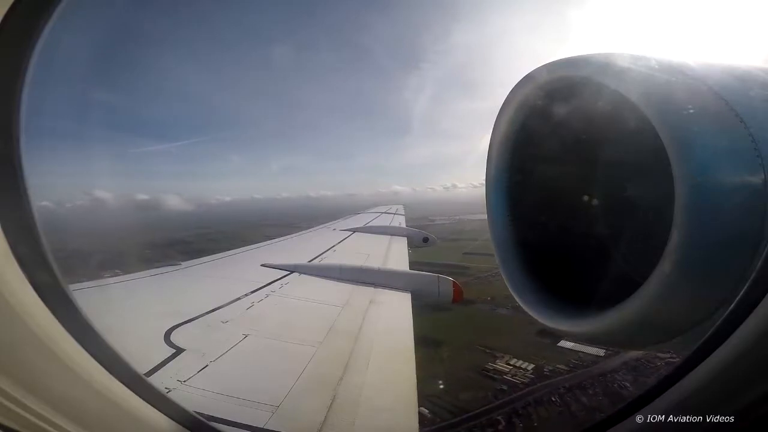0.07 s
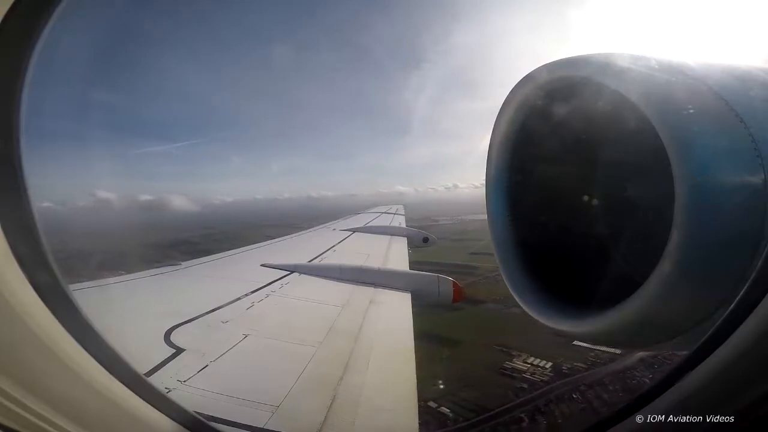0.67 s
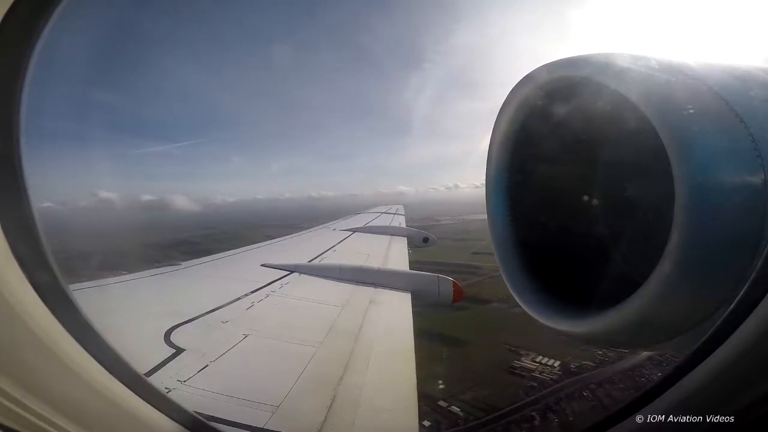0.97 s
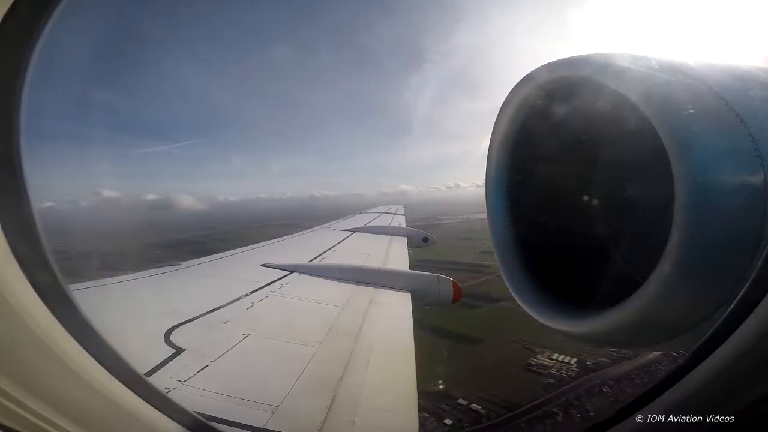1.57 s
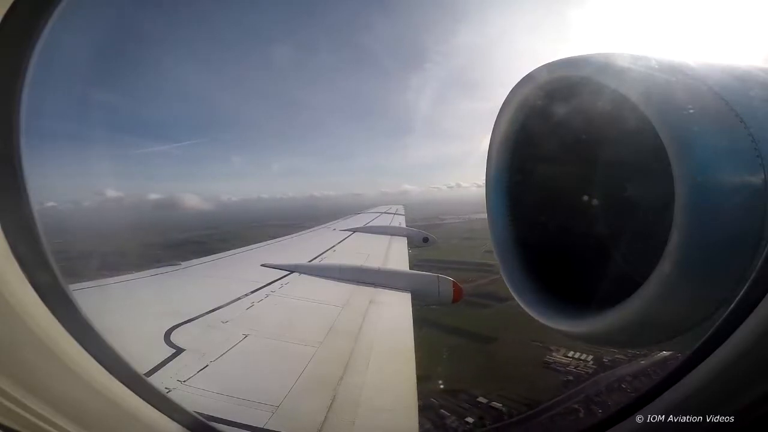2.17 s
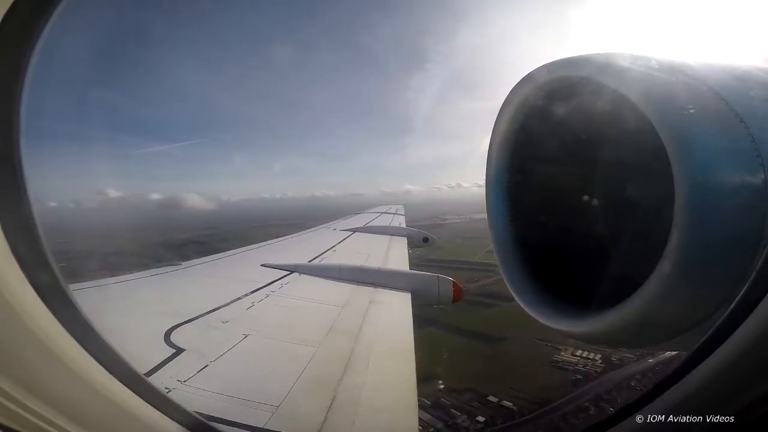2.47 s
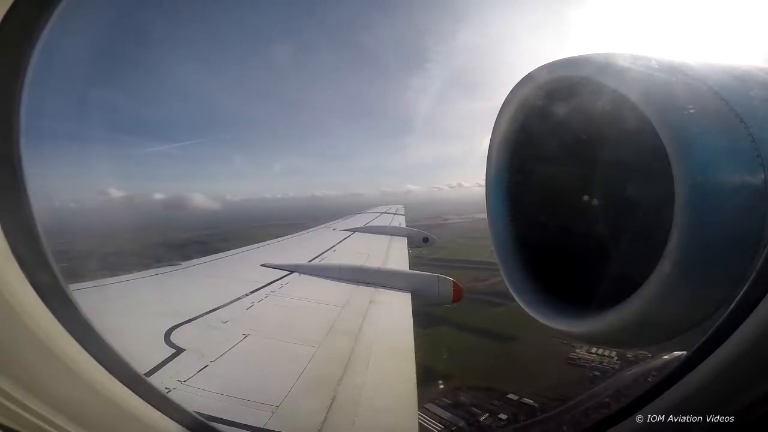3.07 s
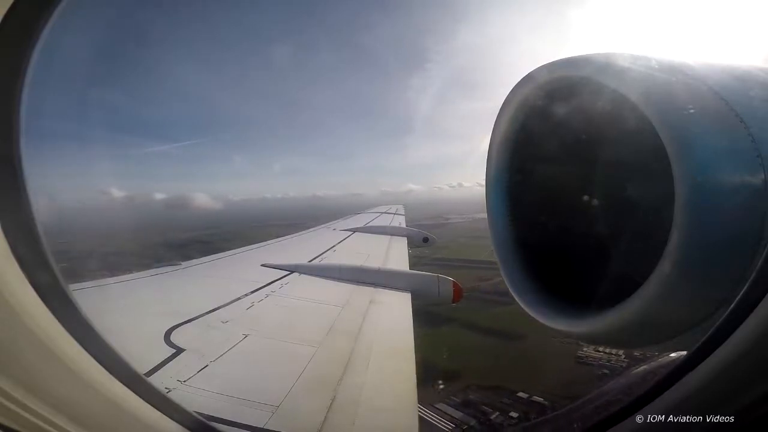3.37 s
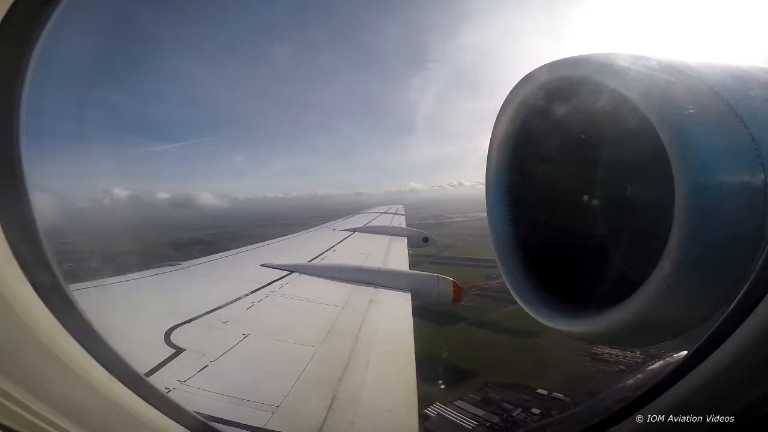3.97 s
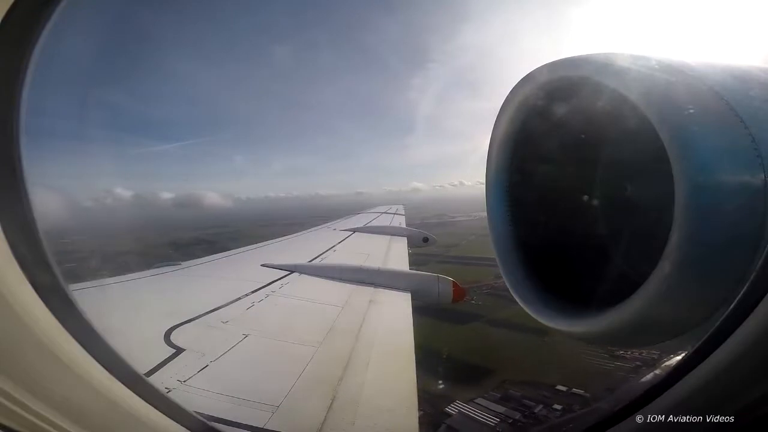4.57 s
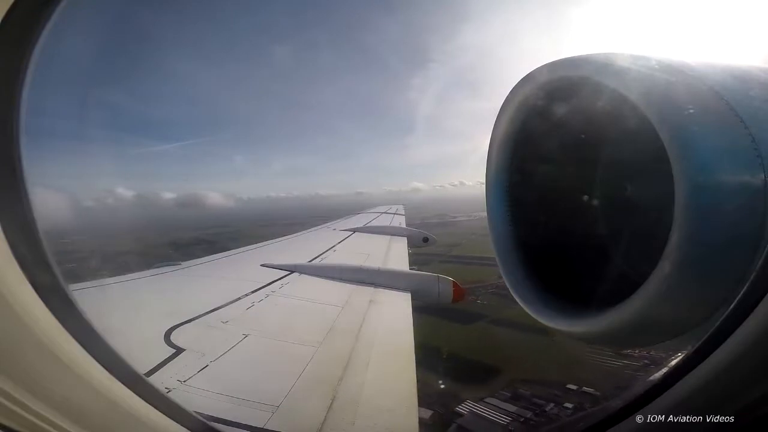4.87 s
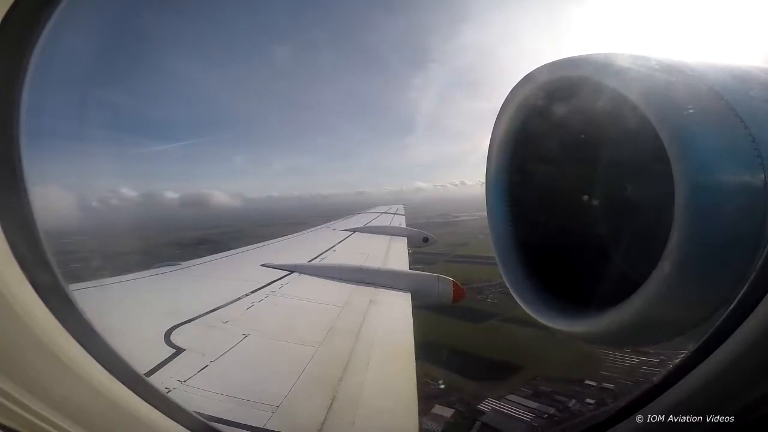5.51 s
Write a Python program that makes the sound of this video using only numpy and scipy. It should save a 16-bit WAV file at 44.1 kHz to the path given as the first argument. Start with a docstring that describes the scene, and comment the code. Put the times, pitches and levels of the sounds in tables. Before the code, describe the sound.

From the first moment to the end, at about 5.5 seconds, a jet airliner in flight is heard from inside the cabin, at a window seat beside one engine. The main sound is a deep, muffled roar of churning air coming through the wall, together with a strong low engine drone. The two engines run at slightly different speeds, so their hum throbs about three times a second, with a quicker flutter from other steady machine hums. Far quieter, a soft airy hiss and a cluster of thin, high turbine tones lie on top. Across the whole stretch, one faint high whistle slowly swells, holding nearly the same pitch and being clearest from about 4 seconds on, though it stays well below the roar. The overall level remains even, with nothing starting or stopping.

```python
"""A jet airliner in flight, heard from a window seat beside one engine.
From the start, two engines turn at slightly different speeds, so their hums throb against each other.
Pumps drone and turbines sing along, while churning air roars through the wall with a hiss on top.
As the seconds pass, all of this carries on, and a whistle chopped by the fan blades slowly swells."""
import sys
import numpy as np
from scipy import signal
from scipy.fft import rfft, irfft, next_fast_len
from scipy.io import wavfile
from scipy.ndimage import uniform_filter1d, minimum_filter1d, map_coordinates

SR = 44100
rng = np.random.default_rng(int(sys.argv[2]) if len(sys.argv) > 2 else 0)


def file_out(sig):
    """Save sig as 16-bit WAV at sys.argv[1]."""
    # one column per channel
    cols = np.atleast_2d(sig).T
    # limit, then scale
    lim = np.clip(cols, -1, 1)
    pcm = np.round(lim * 32767).astype(np.int16)
    wavfile.write(sys.argv[1], SR, pcm)


N = 248704
T = np.arange(N) / SR
# shaft speeds of the near and the far engine [turns per s]
FAN_HZ, CORE_HZ = [39.008, 42.383], [117.22, 124.5]


def amp(db):
    """Turn decibels into a number to multiply by."""
    return 10 ** (np.asarray(db) / 20)


def wobble(rate):
    """A smooth curve through `rate` random values a second."""
    return map_coordinates(rng.standard_normal(int(N * rate / SR) + 4), [T * rate])


def tone(hz, clock, scatter, rate):
    """A tone whose strength and timing waver in churning air."""
    flutter = 1 + scatter * (wobble(rate) + 1j * wobble(rate))
    turns = hz * clock + rng.random()
    return np.sqrt(2) * np.real(flutter * np.exp(2j * np.pi * turns))


def rush(spectrum, resonances):
    """Noise with a broad shape, plus humps at the pitches where something rings."""
    size = next_fast_len(N + 8192)
    hz = np.fft.rfftfreq(size, 1 / SR)
    points, levels = np.transpose(spectrum)
    power = amp(np.interp(np.log(hz + 1), np.log(points + 1), levels)) ** 2
    for centre, width, db in resonances:
        power += amp(db) ** 2 / (1 + ((hz - centre) / width * np.sqrt(2)) ** 2) ** 2
    noise = rfft(rng.standard_normal(size))
    return irfft(noise * np.sqrt(power * SR / 2), size)[:N]


# hum of the near, then the far fan, at 1, 2, 3... times its speed: (level [dB])
FAN_HUMS = [
    [-20.3, -35],
    [-19.8, -26.2, -28.4, -31.3],
]

def fans(in_step_s):
    """Two off-balance fan shafts drift in and out of step, throbbing about three times a second."""
    start = rng.random()
    hum = np.zeros(N)
    for hz, levels in zip(FAN_HZ, FAN_HUMS):
        angle = 2 * np.pi * (hz * (T - in_step_s) + start)
        hum += sum(amp(db) * np.cos(multiple * angle) for multiple, db in enumerate(levels, 1))
    return np.sqrt(2) * hum


# hum of the near, then the far engine's off-balance core shaft: (relative level [dB])
CORE_HUMS = [-23.1, -31.2]
# hums of smaller machines: (pitch [Hz], relative level [dB])
MACHINE_HUMS = [(82.1, -34.3), (166.9, -28.9), (200.6, -37.7), (1214, -69.2)]

def hums(scatter, gain_db):
    """Core shafts and smaller machines shake the wing, which carries their hum into the cabin."""
    notes = [*zip(CORE_HZ, CORE_HUMS), *MACHINE_HUMS]
    return amp(gain_db) * sum(amp(db) * tone(hz, T, scatter, rate=4.3) for hz, db in notes)


# tones of the near, then the far pump: (multiple of the pump's speed, relative level [dB])
PUMP_TONES = [
    [(1, -27.2), (2, -55), (5, -73)],
    [(1, -25.6), (4, -74), (5, -77), (6, -74.6), (8, -68.3)],
]

def pumps(strokes_per_turn, scatter, gain_db):
    """Each core drives a pump through gears; the two drones beat quickly against each other."""
    drone = np.zeros(N)
    for core_hz, tones in zip(CORE_HZ, PUMP_TONES):
        for multiple, db in tones:
            drone += amp(db) * tone(multiple * strokes_per_turn * core_hz, T, scatter, rate=4.5)
    return amp(gain_db) * drone


# tone of each turbine wheel in the near, then the far engine: (level [dB])
WHEEL_LEVELS = [
    [-68, -69.5, -69, -69.8, -66.5, -65.6],
    [-70.5, -77.5, -80, -80.5, -74, -79],
]
WHEEL_BLADES = [63, 72, 77, 85, 94, 99]

def turbines(clock, scatter, octave_db):
    """Each wheel sings at its blade count times its shaft's speed, and faintly an octave higher."""
    whine = np.zeros(N)
    for shaft_hz, levels in zip(FAN_HZ, WHEEL_LEVELS):
        for blades, db in zip(WHEEL_BLADES, levels):
            note = tone(blades * shaft_hz, clock, scatter, rate=22)
            octave = tone(2 * blades * shaft_hz, clock, scatter, rate=22)
            whine += amp(db) * (note + amp(octave_db) * octave)
    return whine


# tones beside the whistle: (distance from it [steps of the chopping rate], relative level [dB])
SIDE_TONES = [(-2, -77), (-1, -66.7), (1, -70.2)]

def whistle(clock, hz, swell_db_per_s, fan_blades, scatter, gain_db):
    """The strongest blade tone swells; passing fan blades chop it, adding a few tones around it."""
    centre = amp(-67.4 + swell_db_per_s * T) * tone(hz, clock, scatter, rate=30)
    chop_hz = fan_blades * FAN_HZ[0]
    sides = sum(amp(db) * tone(hz + step * chop_hz, clock, scatter, rate=30) for step, db in SIDE_TONES)
    return amp(gain_db) * (centre + sides)


# churning air heard through the wall: (pitch [Hz], level [dB per Hz])
ROAR_SHAPE = [(18, -57), (34, -51.5), (50, -36.5), (62, -37), (92, -46), (290, -43), (385, -48), (430, -48),
              (490, -53.5), (600, -64.5), (700, -67.5), (790, -75.5), (970, -79.5), (1200, -80.5),
              (1500, -125)]
# where the cabin air rings: (pitch [Hz], width [Hz], level [dB per Hz])
CABIN_RINGS = [(121, 20, -40.5), (172.7, 13.6, -39.5), (346.3, 20, -38.5), (838, 40, -74)]

def roar(sway_db):
    """The jet and the air along the plane churn; the wall lets their low roar through."""
    return rush(ROAR_SHAPE, CABIN_RINGS) * amp(sway_db * wobble(rate=5.08))


# rushing air: (pitch [Hz], level [dB per Hz])
HISS_SHAPE = [(600, -100), (1350, -92), (1650, -91), (2100, -91.5), (3700, -90), (4300, -91.5),
              (5000, -94.5), (6350, -97.5), (6800, -101), (8800, -107), (12000, -105.3), (14000, -104.7),
              (15200, -109)]
# where the wall panels and the window ring: (pitch [Hz], width [Hz], level [dB per Hz])
PANEL_RINGS = [(1490, 70, -88), (1800, 100, -90), (2740, 180, -84), (2977, 180, -86.5), (5210, 110, -90),
               (6250, 410, -98.5), (13200, 450, -105)]

def hiss(sway_db):
    """Air hisses softly along the plane's skin and out of the vents."""
    return rush(HISS_SHAPE, PANEL_RINGS) * amp(sway_db * wobble(rate=8))


def scene():
    """Engines and rushing air, all heard together at the seat."""
    drone = fans(in_step_s=.237) + hums(scatter=.07, gain_db=-.5)
    drone += pumps(strokes_per_turn=3.0575, scatter=.06, gain_db=-.07)
    # the blade tones sink very slightly as the engines ease off
    speed = 1 - .00018 * (T - T.mean())
    clock = np.cumsum(speed) / SR
    whine = turbines(clock, scatter=.15, octave_db=-19.5)
    whine += whistle(clock, hz=6366.5, swell_db_per_s=1.25, fan_blades=22, scatter=.09, gain_db=.2)
    return (drone + whine + roar(sway_db=.4) + hiss(sway_db=.45))[None]


def limiter(sound, ceiling, look_ahead_s):
    """Turn the volume down smoothly around peaks that would pass the ceiling."""
    span = int(look_ahead_s * SR)
    needed_gain = ceiling / np.maximum(np.abs(sound), ceiling)
    held_gain = minimum_filter1d(needed_gain, 2 * span + 1)
    return sound * uniform_filter1d(uniform_filter1d(held_gain, span), span)


def record(dry):
    """Hold down the loudest peaks and cut away the very highest treble."""
    limited = limiter(dry, ceiling=.9, look_ahead_s=.02)
    margin = SR // 10  # extra sound at both ends keeps the filter from clicking
    padded = np.pad(limited, ((0, 0), (margin, margin)), mode="reflect", reflect_type="odd")
    treble_cut = signal.firwin(401, cutoff=15200, fs=SR)
    return signal.fftconvolve(padded, treble_cut[None], mode="same", axes=1)[:, margin:margin + N]


dry = scene()
out = record(dry)
file_out(out)
```